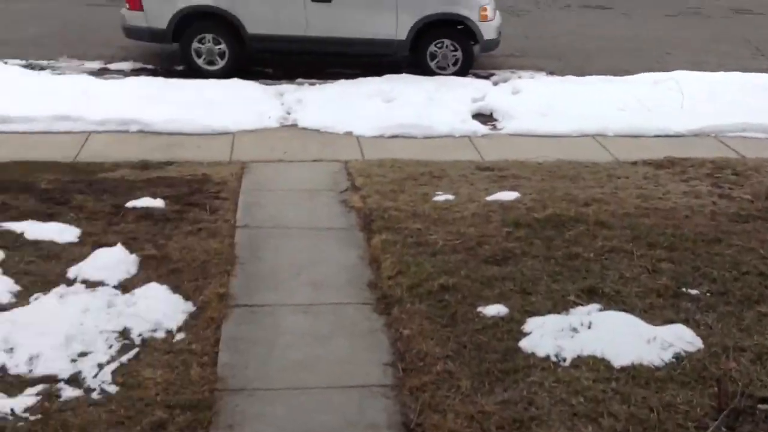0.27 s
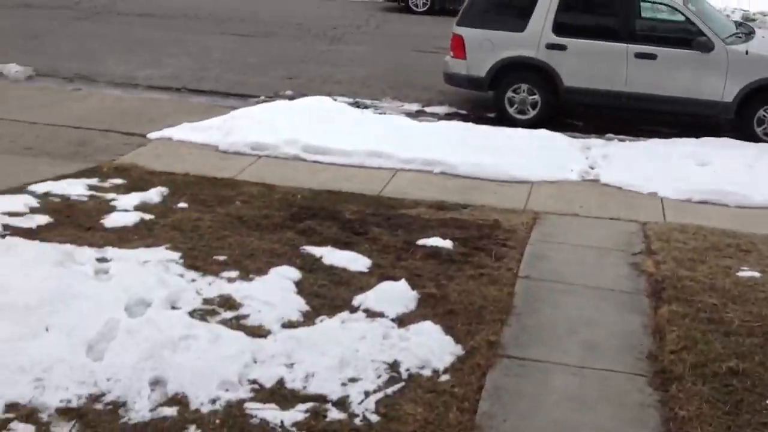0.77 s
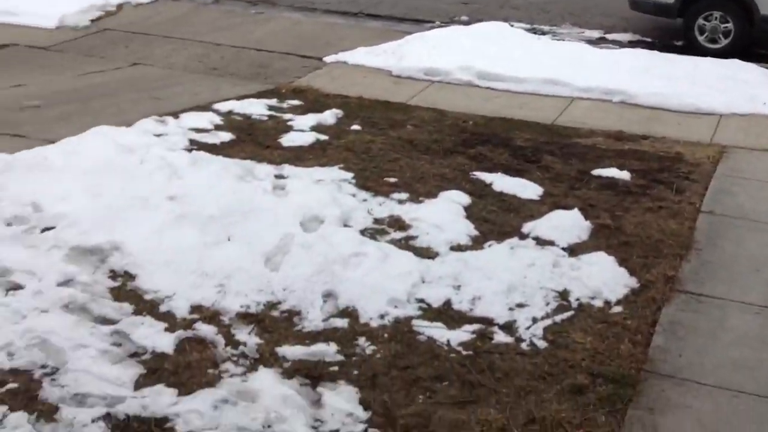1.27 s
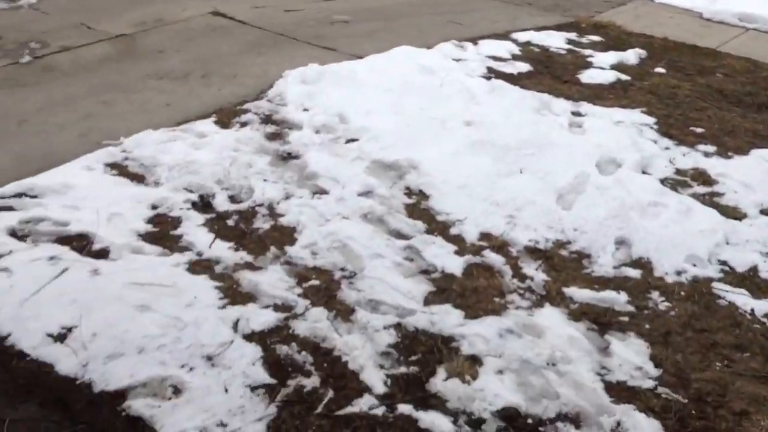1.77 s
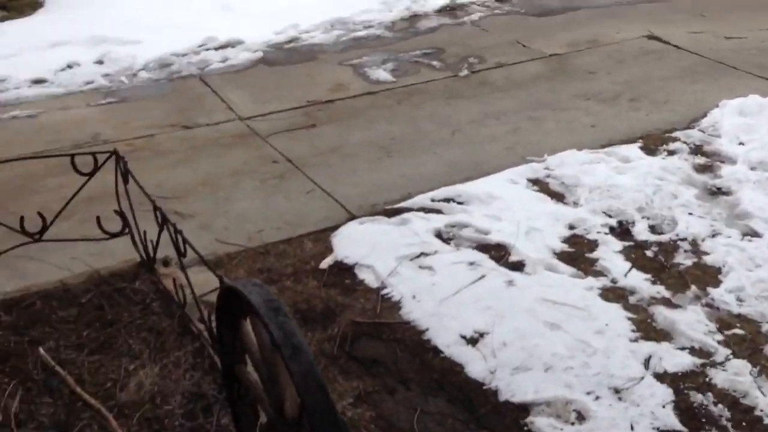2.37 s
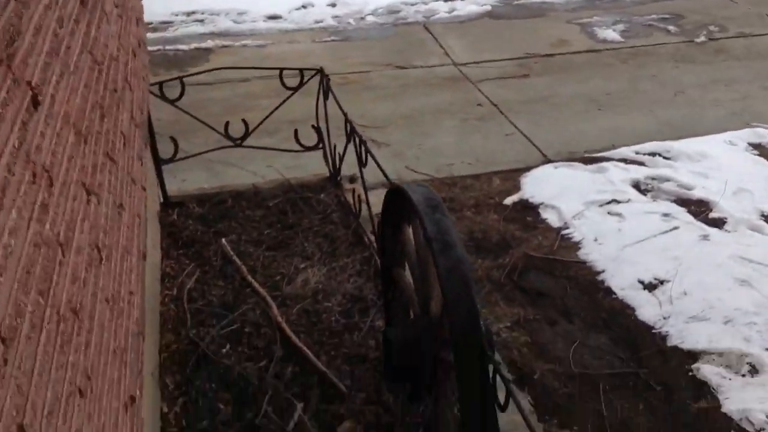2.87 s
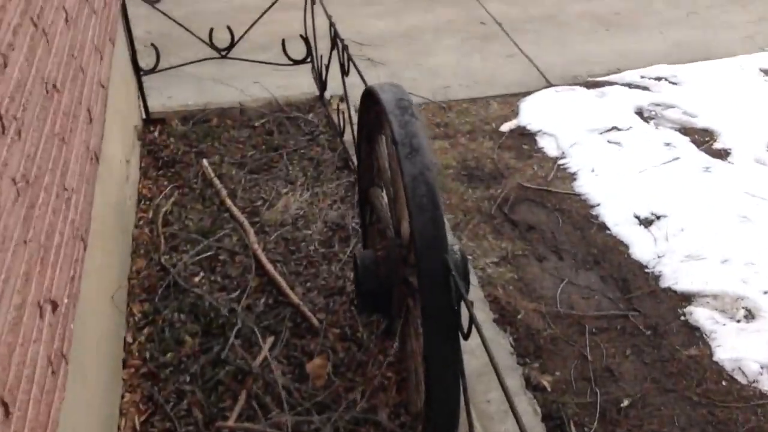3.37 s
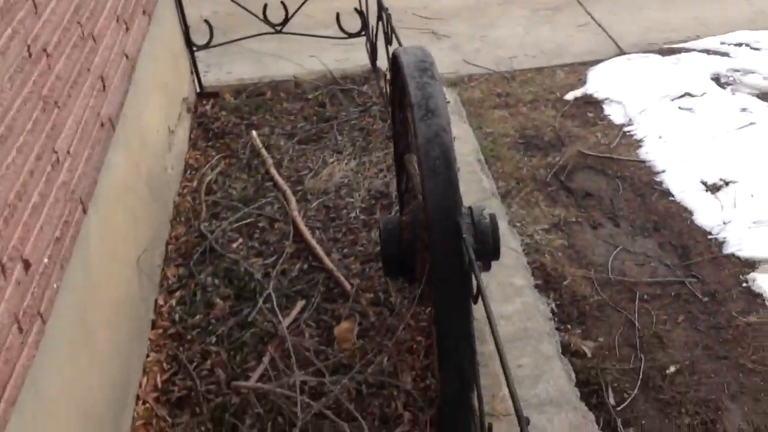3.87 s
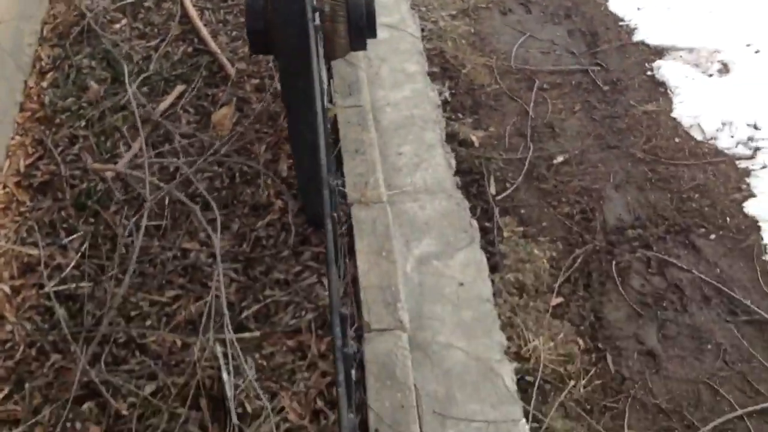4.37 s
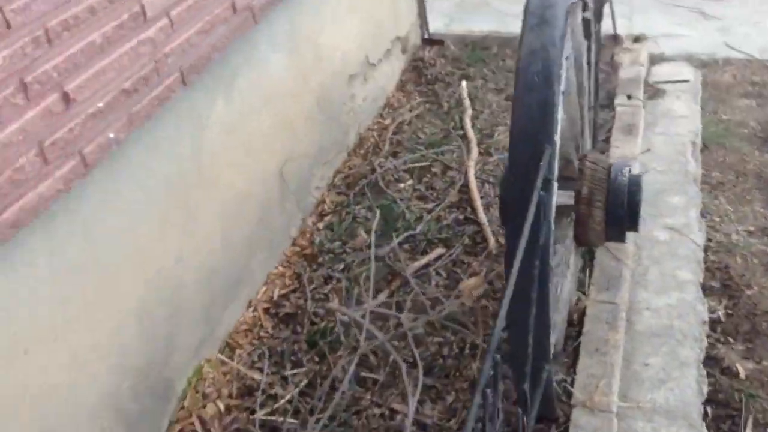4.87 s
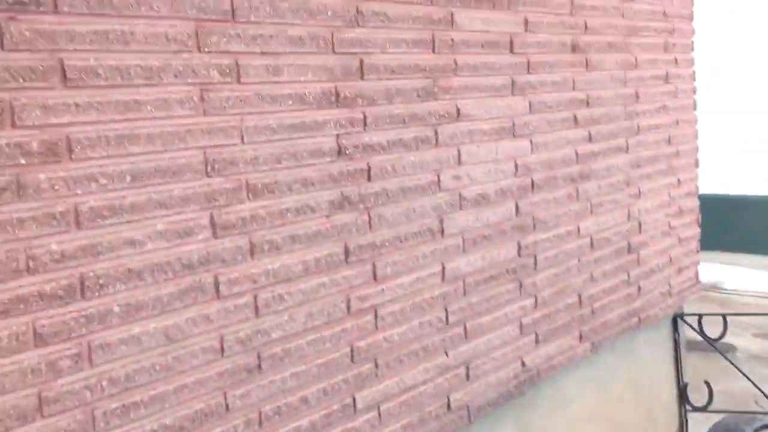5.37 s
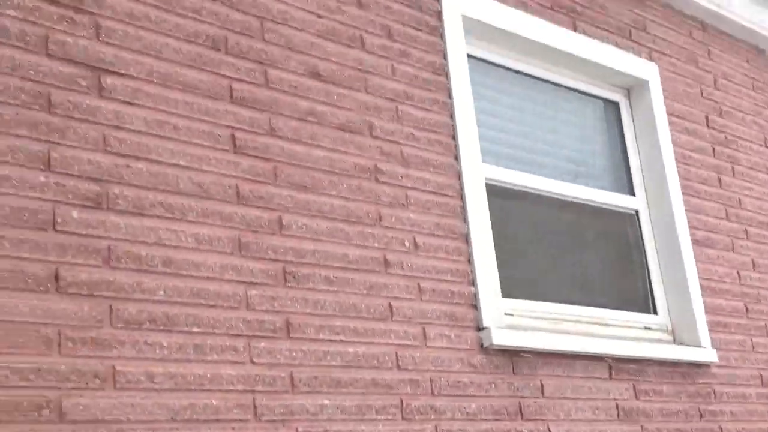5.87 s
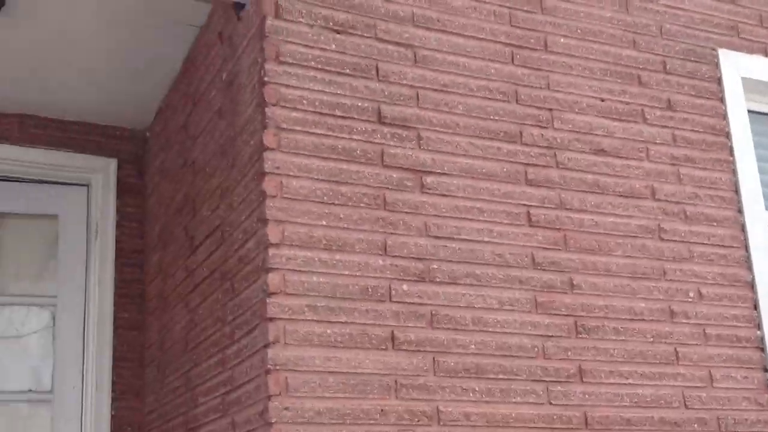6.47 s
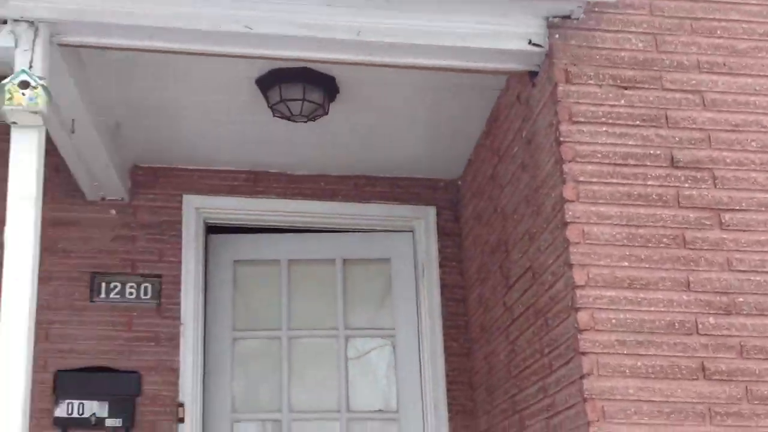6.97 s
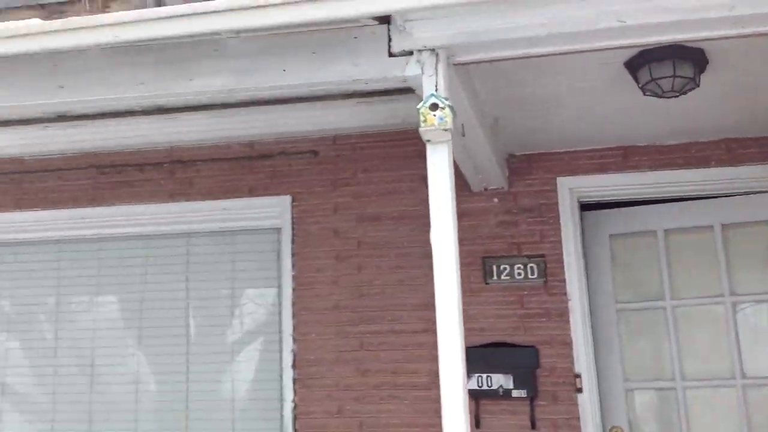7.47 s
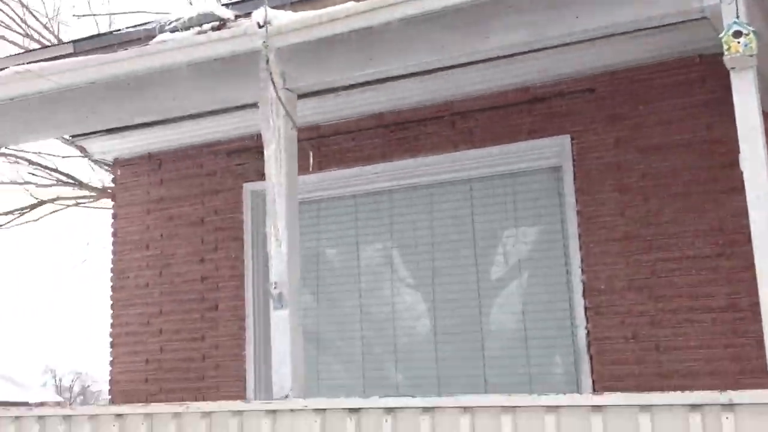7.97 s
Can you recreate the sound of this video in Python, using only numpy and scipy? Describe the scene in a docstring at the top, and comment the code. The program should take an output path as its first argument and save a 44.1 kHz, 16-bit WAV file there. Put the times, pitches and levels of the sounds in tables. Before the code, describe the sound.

Outdoor bird chatter and soft hiss, a few far crow caws, sparse knocking footsteps, then a loud muffled burst of wind on the microphone.

```python
"""A front yard in thawing snow, with far traffic, engines and a few far crows behind it.
Sparrows chatter in the trees: many small bent whistles blurred by echoes, with nearer calls standing out.
A few dull footfalls fall close by, each a thump of quickly dropping pitch. A gust buffets the hand-held
microphone twice, as short bursts of pressure over lumpy rumble. Ticks and rustles come from the hand.
A steady background hiss runs throughout, and a thin high whine fades out early on."""
import sys
import numpy as np
from scipy import signal
from scipy.fft import rfft, irfft
from scipy.io import wavfile
from scipy.ndimage import uniform_filter1d

SR = 44100
rng = np.random.default_rng(int(sys.argv[2]) if len(sys.argv) > 2 else 0)


def output_pcm(signal):
    """Save a mono or channel-first signal as 16-bit PCM at the path in sys.argv[1].

    Samples are clipped to [-1, 1] before scaling.
    """
    pcm = np.clip(np.atleast_2d(signal).T, -1, 1) * 32767
    wavfile.write(sys.argv[1], SR, np.round(pcm).astype(np.int16))


N = 362502   # length of the scene in samples

# Tone colour of far traffic: pitch_hz, level_db (relative, per Hz)
TRAFFIC_COLOUR = [(15, -66), (25, -42), (64, -16), (87, -46), (196, 3.5), (331, -1), (435, -0.5),
                  (910, -1.5), (1040, -4.5), (1420, -5.5), (1700, -9), (2600, -13), (3380, -7),
                  (5720, -120)]
# Loudness of far traffic, before its flicker: time_s, level_db
TRAFFIC_LEVEL = [(0.0, -53.5), (1.99, -50.5), (2.84, -53), (4.46, -52.5), (8.22, -55)]
# Far engines: time_s, rumble_level_db, drone_gain_db
ENGINES = [(0, -68.5, -61), (1.0, -63, -57), (1.2, -90, -60.5), (2.3, -68, -53.5), (2.7, -87, -64),
           (5.2, -73.5, -59.5), (5.6, -71, -61), (8.22, -74, -94)]
# Edges of the engines' deep rumble: low_hz, high_hz
RUMBLE_EDGES = (73, 105)
# Notes in the engines' drone: pitch_hz, width_hz, level_db (relative)
DRONE_NOTES = [(184, 40, -4.5), (259.4, 20, -8.5), (392, 10.4, -12), (865, 24, -9), (927, 15, -8.5)]
# Tone colour of the background hiss: pitch_hz, level_db (relative, per Hz)
HISS_COLOUR = [(1500, -35), (2500, -1), (4000, 6), (6000, 0), (8000, -5.5), (12000, -7.5), (15500, -9.5)]
# Strength of the hiss between 7 and 15 kHz: time_s, level_db
HISS_LEVEL = [(0.0, -68.5), (4.69, -65), (8.22, -70)]
# Strength of a thin high whine: time_s, gain_db
WHINE_LEVEL = [(0, -83), (.65, -72), (.75, -81), (1.0, -82), (1.1, -110), (8.22, -110)]
# Notes in the whine: pitch_hz, width_hz, level_db (relative)
WHINE_NOTES = [(10320, 8, 0), (9410, 8, -9)]

# Wind rumble between the eddies: time_s, level_db
GUST_LEVEL = [(0, -64), (2.2, -58.5), (5.4, -65.5), (5.65, -51), (5.9, -48.5), (6.15, -42.5), (6.2, -27.5),
              (6.4, -31.5), (6.44, -30), (6.48, -58.5), (7.0, -56.5), (7.7, -54.5), (7.75, -45),
              (8.05, -52.5), (8.1, -56), (8.22, -54)]
# Tone colour of the wind rumble: pitch_hz, level_db (relative, per Hz)
GUST_COLOUR = [(15, -73), (25, -51), (80, -36), (111, 2.5), (168, 2), (443, -16.5), (683, -23.5),
               (880, -40), (1140, -73)]
# Hardest eddies striking the microphone port: middle_s, level_db (before filtering), half_width_ms
EDDIES = [(5.662, -36.5, 2.7), (5.812, -39, 2.2), (5.906, -36, 3.7), (5.947, -34, 2.2), (5.959, -37, 5.1),
          (5.988, -34.5, 11), (6.026, -28.5, 7.6), (6.084, -31, 1.7), (6.118, -28, 4.6), (6.161, -41, 1.4),
          (6.18, -30.5, 2.3), (6.204, -19, 2), (6.221, -18.5, 1.9), (6.229, -10.5, 1.03), (6.247, -21, 3.3),
          (6.264, -19, 1), (6.276, -16.5, 1.5), (6.288, -17, 2.5), (6.304, -11, 1.2), (6.316, -23, 1.8),
          (6.326, -24, 1.4), (6.3446, -9, 0.58), (6.373, -19, 1.3), (6.391, -21.5, 3), (6.434, -12, 1.2),
          (6.457, -9, 3), (7.736, -18.5, 0.83), (7.755, -27.5, 1.8), (7.775, -24.5, 2.4), (7.797, -35, 5.5),
          (7.81, -37.5, 1.8), (7.867, -30, 1.7), (7.905, -35.5, 2.8), (7.917, -30.5, 2.4),
          (7.993, -38, 4.3), (8.013, -39.5, 4.5), (8.046, -34, 2)]
# Snaps of the port at the hardest eddies: middle_s, level_db (before filtering), pitch_hz, half_width_ms
PORT_SNAPS = [(6.459, -20.5, 1040, 0.64), (6.4585, -40, 2020, 0.64), (7.732, -37, 1410, 0.58)]

# The flock as a whole: time_s, level_db (before murmur and surges), middle_pitch_hz
FLOCK = [(0.0, -65, 3790), (0.26, -60.5, 3960), (0.36, -50.5, 3820), (0.47, -67, 4110), (0.6, -60.5, 4060),
         (1.08, -59.5, 4390), (1.5, -58, 4185), (1.85, -55, 3523), (2.7, -52.5, 3817), (2.98, -59.5, 3934),
         (3.12, -53, 4110), (3.34, -57.5, 3870), (3.55, -54, 3780), (4.1, -51, 4003), (4.25, -57.5, 4210),
         (4.62, -54, 3766), (5.06, -54, 3620), (5.35, -51, 3480), (5.7, -52.5, 3870), (5.83, -58, 3700),
         (6.04, -52, 3710), (6.16, -59, 3785), (6.28, -59, 3494), (6.42, -56.5, 3940), (6.67, -79, 3570),
         (6.82, -54, 3530), (6.95, -69, 3500), (7.02, -56, 4080), (7.1, -59, 3470), (7.18, -76, 3470),
         (7.26, -54, 3600), (7.36, -61, 3970), (7.42, -57, 4420), (7.49, -54.5, 3650), (7.6, -63, 3830),
         (7.85, -55, 4480), (8.22, -60.5, 3920)]
# Far crows: start_s, length_s, throat_pitch_hz, level_db (before fading the ends)
CAWS = [(0.066, 0.097, 1390, -52.5), (0.465, 0.12, 1400, -57.5), (0.643, 0.084, 1420, -54.5),
        (0.983, 0.26, 1440, -56), (1.638, 0.25, 1355, -54), (2.267, 0.093, 1370, -53)]
# Nearer sparrows, arched chirps: start_s, length_s, top_pitch_hz, level_db (before flutter and echo)
ARCHES = [(0.877, 0.028, 4860, -61), (1.019, 0.029, 5300, -51), (1.031, 0.05, 5250, -54),
          (1.07, 0.032, 5000, -54), (1.088, 0.034, 4240, -49.5), (1.157, 0.03, 5200, -51.5),
          (1.265, 0.059, 5550, -56), (1.326, 0.032, 5600, -55.5), (2.128, 0.046, 5120, -56.5),
          (2.425, 0.031, 3780, -53), (2.498, 0.028, 3360, -56), (2.662, 0.031, 4300, -53),
          (2.792, 0.046, 3550, -55), (2.874, 0.053, 3690, -55.5), (3.073, 0.05, 4800, -53),
          (3.085, 0.026, 3080, -55), (3.37, 0.031, 4480, -54), (3.507, 0.044, 4310, -50.5),
          (3.775, 0.039, 3770, -58), (3.841, 0.034, 5250, -57), (4.016, 0.061, 5600, -57),
          (4.063, 0.074, 5400, -60), (4.504, 0.048, 3300, -57), (4.604, 0.02, 3890, -48.5),
          (4.571, 0.028, 5530, -58), (4.961, 0.063, 5070, -58.5), (5.02, 0.035, 3950, -54),
          (5.197, 0.03, 4300, -55), (5.45, 0.038, 3560, -66), (5.576, 0.054, 6130, -60),
          (5.668, 0.036, 6260, -55.5), (5.636, 0.039, 4770, -52), (5.714, 0.041, 4540, -58),
          (5.753, 0.017, 3850, -50.5), (5.879, 0.033, 3530, -48), (6.433, 0.059, 5060, -57),
          (6.293, 0.035, 5700, -65), (6.652, 0.028, 6300, -69.5), (6.712, 0.04, 5320, -60),
          (7.213, 0.042, 4340, -54.5), (7.275, 0.056, 3650, -60), (7.371, 0.084, 5400, -62.5),
          (7.656, 0.025, 4580, -57.5)]
# Nearer sparrows, sliding whistles: start_s, length_s, start_hz, end_hz, level_db (before flutter and echo)
SLIDES = [(0.965, 0.054, 4720, 3800, -56), (1.328, 0.048, 3150, 2500, -60),
          (1.594, 0.14, 6450, 4050, -57.5), (1.877, 0.04, 3700, 2480, -53),
          (2.249, 0.054, 3890, 3060, -53.5), (2.558, 0.036, 5650, 3800, -62),
          (2.719, 0.042, 4750, 3300, -56.5), (3.167, 0.06, 3500, 3740, -54), (4.15, 0.049, 3900, 4160, -59),
          (4.3, 0.14, 6160, 4040, -54), (4.951, 0.044, 3300, 2800, -60), (5.327, 0.06, 5700, 5530, -54.5),
          (5.39, 0.034, 4400, 3320, -61), (5.921, 0.038, 3340, 2170, -70), (7.788, 0.14, 5500, 3800, -55)]
# Short low notes: start_s, length_s, pitch_hz, level_db (before flutter and echo)
LOW_NOTES = [(4.774, 0.048, 543, -51), (4.956, 0.073, 740, -56)]

# Ticks of the casing in the hand: start_s, peak_db, brightest_hz
TICKS = [(1.3798, -48, 13900), (2.176, -47, 13400), (3.8197, -38.5, 10000), (4.2882, -36, 9000),
         (4.4677, -35, 12400), (4.8863, -44, 7630), (5.3243, -45, 8680), (5.8396, -43, 11200),
         (7.731, -45, 8800), (8.0117, -45, 8100)]
# Cloth rustles: start_s, length_s, low_hz, high_hz, level_db (before fading the ends)
RUSTLES = [(2.63, 0.16, 7000, 15000, -68), (3.374, 0.16, 7000, 15000, -67), (5, 0.069, 9500, 13500, -62),
           (5.309, 0.06, 1600, 10600, -53.5), (5.66, 0.044, 6000, 10000, -65),
           (5.998, 0.084, 6470, 14650, -64), (6.016, 0.081, 915, 1410, -49.5)]
# Footfalls: start_s, level_db (before filtering), first_pitch_hz, settled_pitch_hz, decay_s
STEPS = [(2.591, -31.5, 1090, 318, 0.012), (3.319, -20, 2160, 264, 0.0071),
         (3.961, -21.5, 1250, 220, 0.0038), (4.623, -21.5, 1450, 289, 0.0087),
         (5.168, -33.5, 890, 248, 0.0024), (7.172, -34, 2650, 594, 0.0042),
         (7.594, -37.5, 1110, 398, 0.0054), (7.652, -41, 497, 323, 0.011)]
# Step echoes off wall and kerb: delay_s (on average), level_db (before filtering)
STEP_ECHOES = [(0.012, -11.5), (0.02, -15)]

LUMPS_DB = 5   # spread of the rumble's lumps
# Eddy pitch at full scale, its change per dB of level, and its share of chance
EDDY_HZ, EDDY_HZ_PER_DB, EDDY_SCATTER = 278, 2.5, 0.12
# An eddy leaves slower than it comes, and its pitch sinks by this share
EDDY_TAIL_MS, EDDY_SAG, EDDY_SAG_MS, EDDY_TREBLE_EDGE_HZ = 1.4, 0.52, 3.4, 770

CHIRP_SPREAD_DB, FLOCK_ECHO_DB = 3.5, -5   # uneven chirp loudness; echo against direct chatter
MURMUR_DB = -62   # farther trees that never fall silent, before surges
SURGE_DB, SURGE_RATE_HZ = 1.2, 2.6   # chance swells and lulls of the chatter
# An arch starts and ends at these shares of the way from foot to top; a larger square flattens the top
ARCH_FOOT_HZ, ARCH_START, ARCH_END, ARCH_SQUARE = 2635, 0.56, 0.39, 1.304
SLIDE_HALFWAY = 0.67   # share of the slide done at half time
FLUTTER_DB, BLUR_DB, NEAR_ECHO_DB = 2.2, 3, -5   # near calls: flutter, fast roughness, echo

# Pitch drop and attack, in cycles of the first pitch
STEP_DROP_TURNS, STEP_RISE_TURNS = 1.085, 0.18
STEP_LOW_HZ, STEP_TREBLE_SHARE = 115, 1.04   # bass edge; treble edge against the first pitch
WEIGHT_HZ, WEIGHT_DB, WEIGHT_S = 163, -26.5, 0.0077   # body's push: pitch, level against thump, decay

TOP_CUT_HZ = 15750   # almost nothing is left above this


def amp(db):
    """Turn decibels into a multiplier."""
    return 10 ** (np.asarray(db) / 20)


def rms_one(x):
    """Scale a sound to an average (rms) strength of 1."""
    return x / np.sqrt(np.mean(x ** 2) + 1e-20)


def in_time(rows):
    """Draw straight lines between a table's times, giving one value per sample for each column."""
    times, *columns = np.transpose(rows)
    return [np.interp(np.arange(N) / SR, times, column) for column in columns]


def add(out, start_s, sound):
    """Mix a short sound in at a given time."""
    at = max(round(start_s * SR), 0)
    out[at:at + len(sound)] += sound[:max(N - at, 0)]


def drift(rate_hz):
    """Wander by chance: noise smoothed twice, with a spread of 1."""
    # Worked out once every 40 samples; the first 2000 values let the filter settle
    r = np.exp(-80 * np.pi * rate_hz / SR)
    slow = signal.lfilter([1], [1, -2 * r, r * r], rng.standard_normal(N // 40 + 2002))[2000:]
    return np.interp(np.arange(N) / 40, np.arange(len(slow)), rms_one(slow))


def coloured(spectrum):
    """Shape noise by giving each frequency its own strength."""
    hz, level_db = np.transpose(spectrum)
    grid = np.maximum(np.arange(N // 2 + 1) * SR / N, 1)
    shape = amp(np.interp(np.log(grid), np.log(hz), level_db, left=-70, right=-70))
    return irfft(rfft(rng.standard_normal(N)) * shape, N)


def band(x, low_hz, high_hz):
    """Keep mainly the frequencies between two edges."""
    edges = [low_hz, min(high_hz, .45 * SR)]
    return signal.sosfilt(signal.butter(2, edges, "band", fs=SR, output="sos"), x)


def low_pass(x, hz):
    """Cut the treble steeply."""
    return signal.sosfilt(signal.butter(4, hz, fs=SR, output="sos"), x)


def resonance(x, hz, width_hz):
    """Ring at one pitch, as a hollow body does, with a gain of 1 at the peak."""
    r = np.exp(-np.pi * width_hz / SR)
    feedback = [1, -2 * r * np.cos(2 * np.pi * hz / SR), r * r]
    return signal.lfilter((1 - r * r) / 2 * np.array([1, 0, -1]), feedback, x)


def ringing_noise(notes):
    """Send noise twice through each narrow resonance, making unsteady tones."""
    out = np.zeros(N)
    for hz, width_hz, level_db in notes:
        once = resonance(rng.standard_normal(N), hz, width_hz)
        out += amp(level_db) * rms_one(resonance(once, hz, width_hz))
    return out


def whistle(length_s, start_hz, middle_hz, end_hz, square=1):
    """Bend a sine through three pitches; it fades at both ends and has rms 1 at its loudest."""
    u = np.linspace(-1, 1, max(round(length_s * SR), 8))
    bend = np.sign(u) * np.abs(u) ** square
    slope = (end_hz - start_hz) / 2
    arch = (start_hz + end_hz) / 2 - middle_hz
    hz = middle_hz + slope * bend + arch * bend ** 2
    return np.sqrt(2 * (1 - u ** 4)) * np.sin(2 * np.pi * np.cumsum(hz) / SR)


def among_houses(x, t60):
    """Smear a sound into echoes from walls and trees that drop 60 dB in t60 seconds."""
    t = np.arange(round(.3 * SR)) / SR
    tail = rng.standard_normal(len(t)) * amp(-60 * t / t60)
    return signal.fftconvolve(x, tail / np.sqrt(np.sum(tail ** 2)))[:N]


def traffic():
    """Far traffic is a coloured noise whose level changes slowly and flickers a little."""
    road = coloured(TRAFFIC_COLOUR)
    level_db = in_time(TRAFFIC_LEVEL)[0] + 0.99 * drift(28.0)
    return road * amp(level_db) / np.std(band(road, 120, 5300))


def engines():
    """Far engines mix a deep band of noise with a drone of ringing notes."""
    rumble_db, drone_db = in_time(ENGINES)
    rumble = rms_one(band(band(rng.standard_normal(N), *RUMBLE_EDGES), *RUMBLE_EDGES))
    return amp(rumble_db) * rumble + amp(drone_db) * ringing_noise(DRONE_NOTES)


def background_hiss():
    """Noise strongest near 4 kHz makes a steady background hiss of slowly changing level."""
    hiss = coloured(HISS_COLOUR)
    return hiss * amp(in_time(HISS_LEVEL)[0]) / np.std(band(hiss, 7000, 15000))


def whine():
    """Very narrow ringing noise makes a thin high whine."""
    return amp(in_time(WHINE_LEVEL)[0]) * ringing_noise(WHINE_NOTES)


def wind_rumble():
    """Low coloured noise, swelling and fading in chance lumps, fills the gaps between eddies."""
    lumps = amp(LUMPS_DB * np.minimum(drift(36.6), 1.6))
    return amp(in_time(GUST_LEVEL)[0]) * rms_one(lumps * coloured(GUST_COLOUR))


def wind_hits():
    """Each eddy is a brief pressure swing with a sharper crest and sinking tail; the port also snaps."""
    eddies, snaps = np.zeros(N), np.zeros(N)
    t = np.arange(-882, 1323) / SR   # time zero is the middle of a hit
    ms, after_ms = t * 1000, np.maximum(t * 1000, 0)
    for s, level_db, half_ms in EDDIES:
        chance = 1 + EDDY_SCATTER * rng.uniform(-0.91, 1)
        sag = 1 - EDDY_SAG * (1 - np.exp(-after_ms / EDDY_SAG_MS))
        hz = (EDDY_HZ + EDDY_HZ_PER_DB * level_db) * chance * sag   # weaker eddies sound lower
        turns = np.cumsum(hz) / SR + rng.random()
        swell = np.exp(-.5 * (ms / (half_ms + EDDY_TAIL_MS * (t > 0))) ** 2)
        puff = swell * np.cos(2 * np.pi * turns)
        crest = np.exp(-.5 * (ms / half_ms) ** 2) * np.cos(2 * np.pi * 1.7 * turns)
        add(eddies, s + t[0], amp(level_db) * (puff + amp(-12) * crest))
    for s, level_db, hz, half_ms in PORT_SNAPS:
        swell = np.exp(-.5 * (ms / half_ms) ** 2)
        add(snaps, s + t[0], amp(level_db) * swell * np.cos(2 * np.pi * (hz * t + rng.random())))
    hits = low_pass(eddies, EDDY_TREBLE_EDGE_HZ) + snaps
    # The port leaks the deep bass
    return signal.sosfilt(signal.butter(3, 105, "high", fs=SR, output="sos"), hits)


def flock(count=2000):
    """Many short steep chirps at random moments, around the flock's middle pitch, blur into echoes."""
    level_db, middle_hz = in_time(FLOCK)
    out = np.zeros(N)
    when, draw = rng.random((count, 2)), rng.standard_normal((count, 4))
    for (moment, long), (top, rise, fall, loud) in zip(when, draw):
        hz = middle_hz[int(moment * N)] * np.exp(0.17 * top)
        start_hz, end_hz = hz * (.8 + 0.13 * rise), hz * (0.78 + 0.124 * fall)
        chirp = whistle(.016 + .028 * long, start_hz, hz, end_hz, ARCH_SQUARE)
        add(out, moment * N / SR, amp(CHIRP_SPREAD_DB * np.clip(loud, -2, 2)) * chirp)
    out *= amp(3 * drift(60))   # moving twigs make each note flutter
    out += amp(FLOCK_ECHO_DB) * among_houses(out, t60=0.22)
    out = band(out, 2940, 5570)
    # Birds fill each other's gaps, so the chatter is evened out before its level is set
    even = np.sqrt(uniform_filter1d(out ** 2, size=2500) + 0.016 * np.mean(out ** 2))
    level = np.hypot(amp(level_db), amp(MURMUR_DB))
    return level * amp(SURGE_DB * drift(SURGE_RATE_HZ)) * out / even


def crows():
    """Rough noise rings in a crow's throat; only that resonance carries this far."""
    out = np.zeros(N)
    for s, length_s, throat_hz, level_db in CAWS:
        rasp = rng.standard_normal(round(.4 * SR))[:round(length_s * SR)]
        rasp = resonance(resonance(rasp, throat_hz, 220), throat_hz, 220)
        add(out, s, amp(level_db) * rms_one(rasp) * np.hanning(len(rasp)) ** .5)
    return out


def near_birds():
    """Arched, sliding and short low whistles stand out of the chatter; twigs and air make them flutter."""
    out = np.zeros(N)
    for s, length_s, top_hz, level_db in ARCHES:
        climb_hz = top_hz - ARCH_FOOT_HZ
        start_hz, end_hz = ARCH_FOOT_HZ + climb_hz * ARCH_START, ARCH_FOOT_HZ + climb_hz * ARCH_END
        add(out, s, amp(level_db) * whistle(length_s, start_hz, top_hz, end_hz, ARCH_SQUARE))
    for s, length_s, start_hz, end_hz, level_db in SLIDES:
        middle_hz = start_hz + SLIDE_HALFWAY * (end_hz - start_hz)
        add(out, s, amp(level_db) * whistle(length_s, start_hz, middle_hz, end_hz))
    for s, length_s, hz, level_db in LOW_NOTES:
        add(out, s, amp(level_db) * whistle(length_s, hz, hz, hz))
    out *= amp(FLUTTER_DB * drift(28) + BLUR_DB * drift(240))
    return out + amp(NEAR_ECHO_DB) * among_houses(out, t60=0.18)


def casing_ticks():
    """The plastic casing clicks: a tiny burst of noise, broadly resonant, dies in a millisecond or two."""
    out, t = np.zeros(N), np.arange(300) / SR
    for s, peak_db, hz in TICKS:
        burst = rng.choice([-1, 1], len(t)) * np.exp(-t / 0.0006)
        tick = resonance(burst, hz, 9000)
        add(out, s, amp(peak_db) * tick / np.max(np.abs(tick)))
    return out


def cloth_rustles():
    """Rubbing cloth gives a brief band of noise that fades in and out."""
    out = np.zeros(N)
    for s, length_s, low_hz, high_hz, level_db in RUSTLES:
        rub = band(rng.standard_normal(round(.3 * SR)), low_hz, high_hz)[:round(length_s * SR)]
        add(out, s, amp(level_db) * rms_one(rub) * np.hanning(len(rub)) ** .5)
    return out


def steps():
    """Packed snow gives way in a thump whose pitch drops at once, with dull echoes and slumping grains."""
    out, t = np.zeros(N), np.arange(round(.06 * SR)) / SR
    for s, level_db, first_hz, settled_hz, decay_s in STEPS:
        hz = settled_hz + (first_hz - settled_hz) * np.exp(-t * first_hz / STEP_DROP_TURNS)
        attack = (1 - .5 * np.exp(-t / 0.0012)) * np.minimum(t * first_hz / STEP_RISE_TURNS, 1)
        swell = attack * np.exp(-(t / decay_s) ** 2)
        tone = swell * np.sin(2 * np.pi * np.cumsum(hz) / SR)
        thump = amp(level_db) * band(tone, STEP_LOW_HZ, 2 * first_hz)
        # The low push of the body's weight
        weight = amp(level_db + WEIGHT_DB) * np.sin(2 * np.pi * WEIGHT_HZ * t) * np.exp(-t / WEIGHT_S)
        thump = low_pass(thump + band(weight, STEP_LOW_HZ, first_hz), STEP_TREBLE_SHARE * first_hz)
        add(out, s, thump)
        for delay_s, echo_db in STEP_ECHOES:
            late_s = delay_s + rng.normal(0, 0.00244)
            add(out, s + late_s, amp(echo_db) * band(thump, 89, 530))
        # Loose grains slump under the boot
        settling = rms_one(band(rng.standard_normal(len(t)), 148, 380))
        add(out, s, amp(level_db - 13.0 - 60 * t / 0.15) * settling)
    return out


def scene():
    """Add all the sources together at one microphone."""
    background = traffic() + engines() + background_hiss() + whine()
    wind = wind_rumble() + wind_hits()
    birds = flock() + crows() + near_birds()
    handling = casing_ticks() + cloth_rustles()
    return (background + wind + birds + handling + steps())[None]


def record(dry):
    """The microphone loses the deepest bass, and the top is cut steeply."""
    thinned = signal.sosfilt(signal.butter(2, 50, "high", fs=SR, output="sos"), dry)
    return signal.sosfilt(signal.cheby2(20, 70, TOP_CUT_HZ, fs=SR, output="sos"), thinned)


dry = scene()
out = record(dry)
output_pcm(out)
```